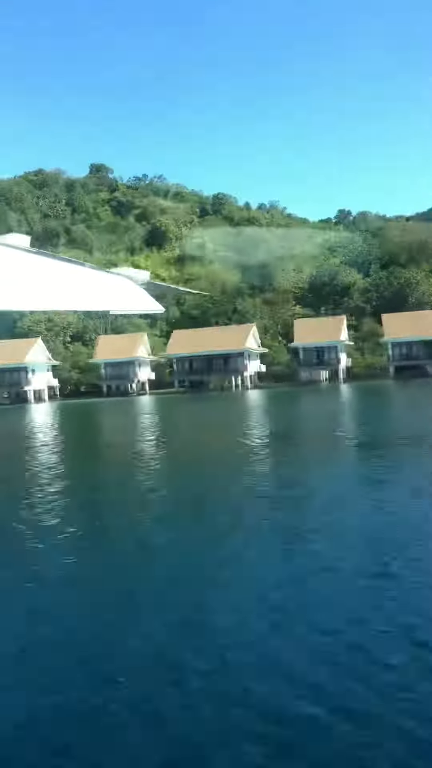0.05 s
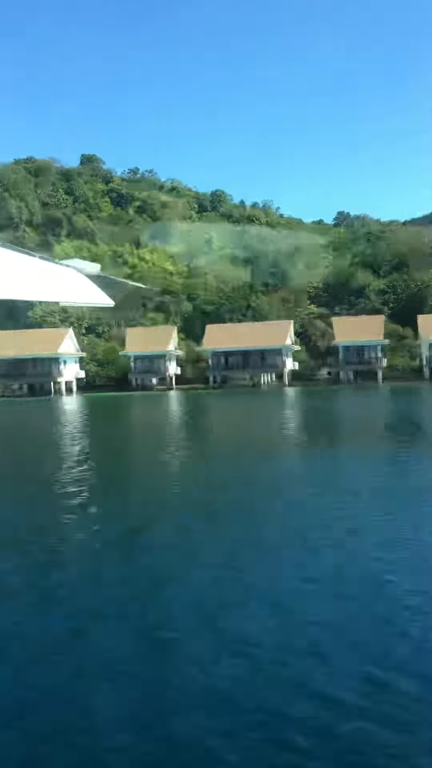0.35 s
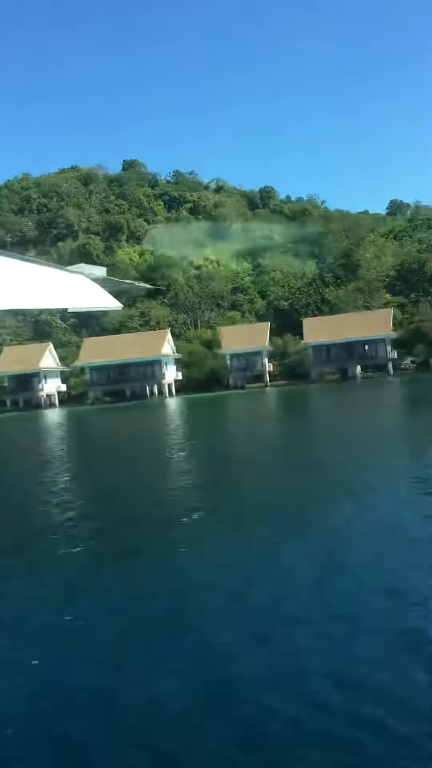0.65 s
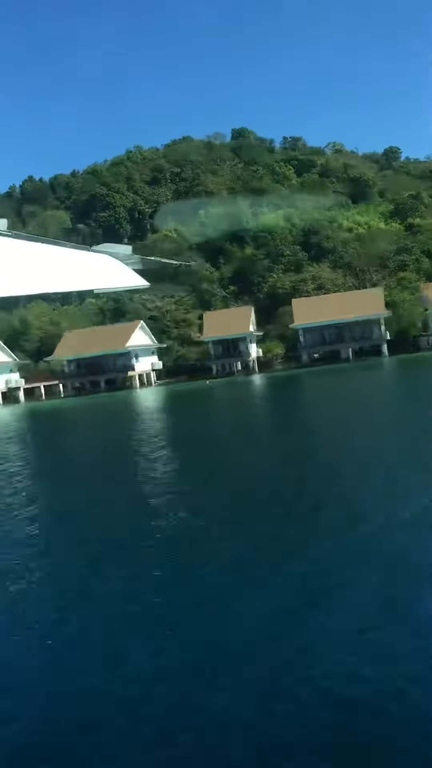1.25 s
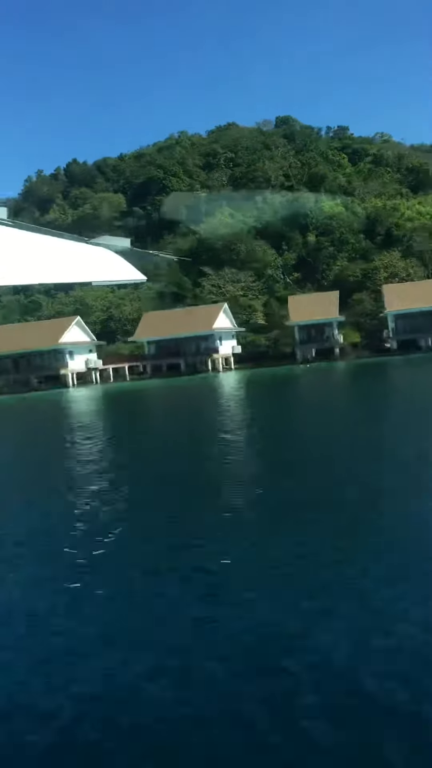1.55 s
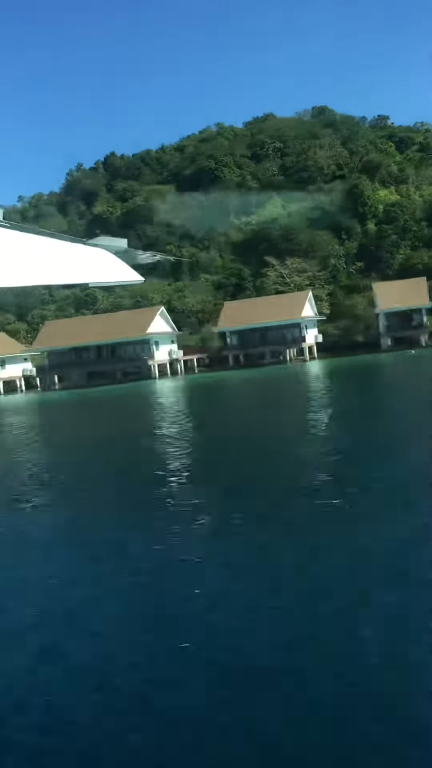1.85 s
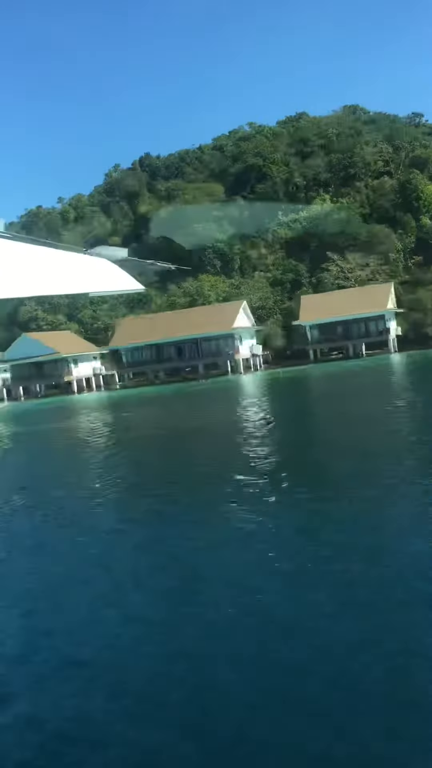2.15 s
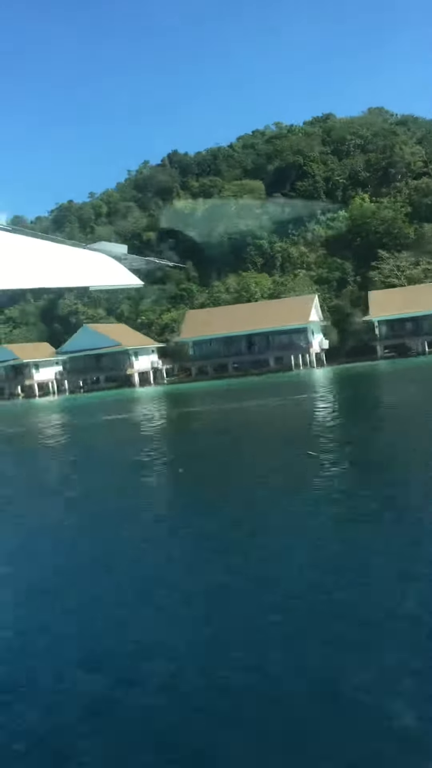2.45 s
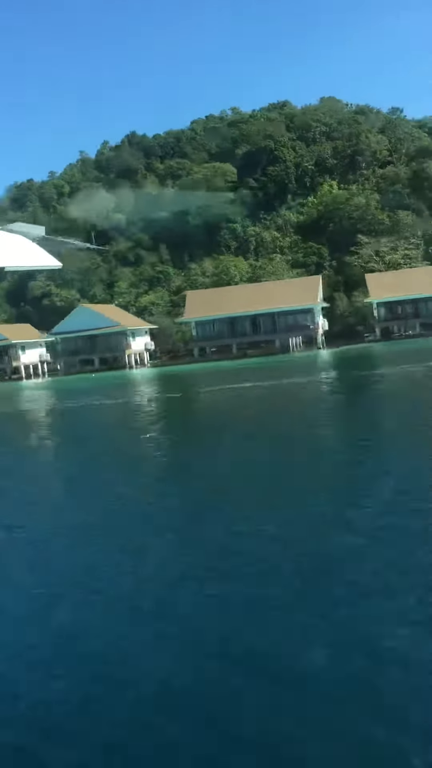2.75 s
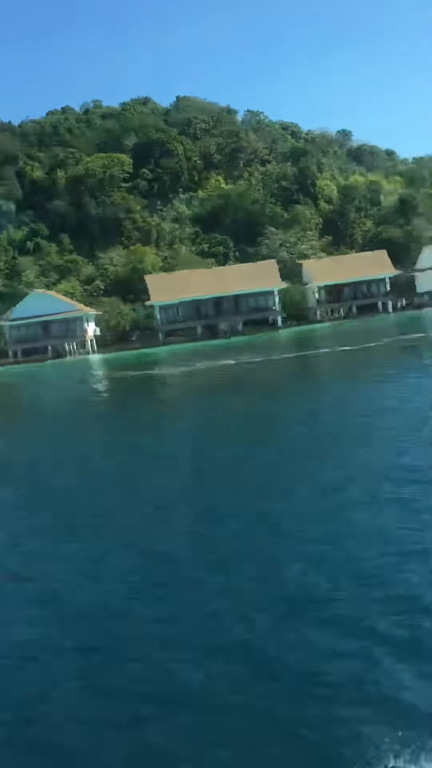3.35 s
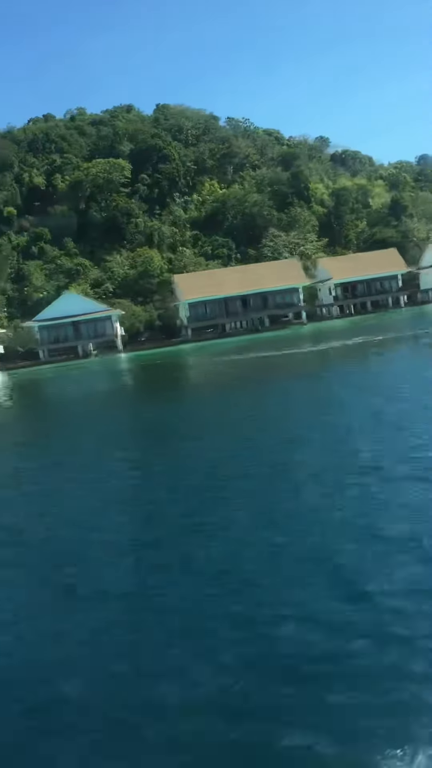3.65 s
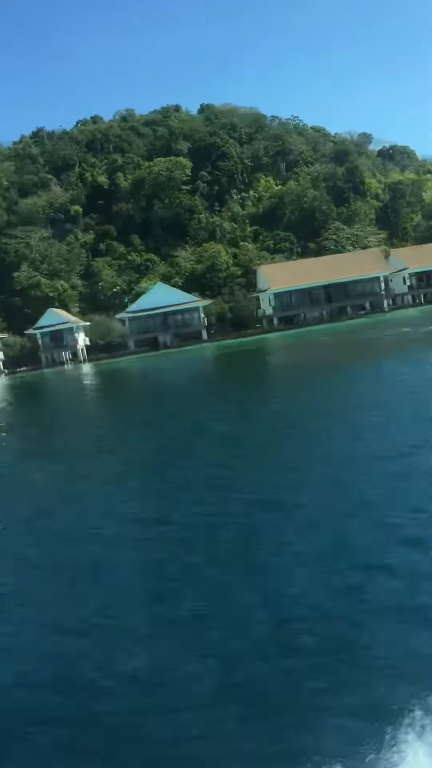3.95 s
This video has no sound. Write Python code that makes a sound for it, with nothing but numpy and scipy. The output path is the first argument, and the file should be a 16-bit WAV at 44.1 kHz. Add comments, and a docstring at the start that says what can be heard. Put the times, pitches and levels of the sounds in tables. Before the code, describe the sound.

Dull seaplane engine rumble inside the cabin, with howling air and short thumps.

```python
"""Engine and airframe rumble dully inside a seaplane skimming low over the water.
Their vibration makes the cabin boom, swelling in low buffets and short thumps as the airframe jolts.
Turbulent air howls in the cabin, sounds two resonances and hisses along the window.
Near the end, spray adds a brighter roar. A propeller drone and thin engine whines are faintly heard."""
import sys
import numpy as np
from scipy import signal
from scipy.fft import rfft, irfft
from scipy.io import wavfile
from scipy.ndimage import uniform_filter1d

SR = 44100
rng = np.random.default_rng(int(sys.argv[2]) if len(sys.argv) > 2 else 0)


def to_wav(sig):
    """Store sig (one row per channel, or 1-D mono) as 16-bit WAV at the path in sys.argv[1].

    Samples outside -1..1 are clipped; the rate is SR.
    """
    pcm = np.clip(np.atleast_2d(sig), -1, 1) * 32767
    pcm = np.round(pcm).astype(np.int16)
    wavfile.write(sys.argv[1], SR, pcm.T)  # frames by channels


N = 176400

# Propeller drone and engine whines. Each row: frequency in Hz, first level in dB, last level in dB,
# pitch waver as a fraction.
ENGINE_TONES = [(117.5, -27, -29, 0.044), (1449, -58, -51, 0.00073), (13303, -67, -67, 0.001033)]

# Roar of the spray. Each row: time in seconds, level in dB.
SPRAY_ENVELOPE = [(0, -74), (3.05, -55), (3.35, -33), (3.65, -30), (4, -30)]
# Spectrum of the spray. Each row: frequency in Hz, relative density in dB.
SPRAY_SPECTRUM = [(250, -24), (400, 5), (500, -21.5), (700, -5.5), (850, 4), (1000, 1.5), (1200, -10),
                  (1600, -12.5), (4000, -33)]

# Hollow ring within the howl. Each row: time in seconds, frequency in Hz, level in dB.
RING_PATH = [(0.4, 710, -45), (.85, 742, -34.5), (1.5, 742, -37.5), (1.72, 735, -42), (1.92, 729, -34),
             (2.2, 730, -33.5), (2.4, 660, -36.5), (3.2, 650, -36), (3.65, 702, -28)]
# Strength of the airflow. Each row: time in seconds, relative levels of howl, rush and hiss in dB.
AIRFLOW_ENVELOPES = [(0.0, -31.5, -36, -39), (0.45, -30.5, -35, -37), (0.75, -30, -33.5, -35.5),
                     (1.1, -28, -32, -35), (1.55, -29, -33, -35.5), (1.68, -31, -33.5, -37.5),
                     (1.82, -30.5, -34, -37.5), (1.95, -29, -34, -35.5), (2.5, -29.5, -33.5, -37),
                     (2.85, -28.5, -32.8, -34), (3.2, -29, -33.5, -35), (3.38, -28, -32, -34),
                     (3.7, -27, -34.5, -34), (4.0, -29.5, -34, -35.5)]
# Spectra of the airflow, from low to high. Each row: frequency in Hz, relative density in dB.
HOWL_SPECTRUM = [(200, -33), (450, -11), (540, -5), (620, 0.5), (765, 0), (815, -6), (960, -7),
                 (1100, -13.5), (1500, -20.5), (3000, -50)]
RUSH_SPECTRUM = [(400, -11.5), (1000, -4), (1600, -6), (1850, -1), (2350, -1.5), (2740, -3.5), (3150, -3),
                 (3900, -6.5), (4900, -10), (7000, -18.5), (10400, -29), (11000, -18), (16000, -20.5)]
HISS_SPECTRUM = [(3000, -19), (4950, -8.5), (5300, 0), (7100, 1), (9000, -4.5), (9800, -6), (10400, -12.5),
                 (11200, -19.5), (16000, -15)]
SIZZLE_SPECTRUM = [(5000, -23), (7000, -1), (7600, -1), (8100, 3), (8700, 3), (9500, -6), (10400, -27),
                   (16000, -40)]

# Jolts of the airframe, and a brief hum swelling at the very start (first row). Each row: peak time in seconds,
# half-width in seconds, pitch in Hz, level in dB.
BURSTS = [(0.035, 0.061, 125, -14.5), (0.53, .06, 102, -13), (0.72, 0.018, 108, -9),
          (1.59, 0.033, 130.5, -9.5), (2.39, 0.013, 190.9, -12.5), (2.809, 0.021, 137, -11),
          (2.998, 0.04, 112, -8), (3.261, 0.037, 154.2, -12.5), (3.539, 0.022, 155, -11),
          (3.782, 0.059, 120, -11.5)]
# Buffets on the airframe. Each row: start in seconds, length in seconds, relative level in dB.
BUFFET_EVENTS = [(0.415, 0.24, -19), (1.1, 0.12, -14), (1.53, 0.27, -12.5), (2.266, 0.51, -14),
                 (2.853, 0.2, -11.5), (3.095, 0.45, -14.5), (3.654, 0.39, -13)]
# Spectra of the buffets, rumble and cabin boom. Each row: frequency in Hz, relative density in dB.
BUFFET_SPECTRUM = [(20, -48), (30, -23), (40, -2), (65, -2.5), (120, -11.5), (180, -18), (400, -60),
                   (1000, -84)]
RUMBLE_SPECTRUM = [(20, -52), (30, -29), (46, -2), (65, -4), (88, -4.5), (112, 2), (145, -2.5), (180, -8),
                   (260, -20.5), (500, -37), (1500, -77)]
BOOM_SPECTRUM = [(60, -54), (130, -2.5), (175, 2), (210, .5), (245, -3.5), (290, -5), (335, -9.5),
                 (385, -14), (450, -20.5), (700, -26), (2000, -73)]
# Strength of the rumble and of the boom above it. Each row: time in seconds, relative level in dB.
RUMBLE_ENVELOPE = [(0.0, -18.5), (0.55, -16), (0.9, -18), (1.5, -18.5), (1.6, -18), (1.8, -17),
                   (2.22, -18.5), (2.6, -17), (3.0, -16.5), (3.1, -18), (3.4, -15), (4.0, -17)]
BOOM_ENVELOPE = [(0.0, -23.5), (0.45, -21), (1.65, -21.5), (1.82, -25), (2.2, -22), (2.35, -16.5),
                 (2.95, -16.5), (3.15, -21.5), (3.6, -20.5), (4.0, -24.5)]
# Sinking throb in the first second. Each row: time in seconds, frequency in Hz, level in dB.
THROB_PATH = [(0, 84, -30), (.15, 82.2, -23.5), (.33, 75.9, -19.5), (.45, 67, -19.5), (.63, 59.6, -21),
              (.9, 59.3, -62)]


def amp(db):
    """Amplitude grows tenfold for every 20 dB."""
    return 10 ** (np.asarray(db) / 20)


def unit(x):
    """Normalisation to an rms of one."""
    return x / np.sqrt(np.mean(x ** 2) + 1e-20)


def curve(table, column=1):
    """Linear interpolation gives one column of a time table at every sample."""
    rows = np.array(table)
    return np.interp(np.arange(N) / SR, rows[:, 0], rows[:, column])


def level(table, column=1):
    """An amplitude envelope follows one dB column of a time table."""
    return amp(curve(table, column))


def drift(rate_hz):
    """Low-pass filtered noise gives a slow random fluctuation of rms one."""
    hz = np.fft.rfftfreq(N, 1 / SR)
    white = rfft(rng.standard_normal(N))
    return unit(irfft(white * (hz > 0) / (1 + (hz / rate_hz) ** 4), N))


def noise(spectrum):
    """Spectral shaping turns white noise into turbulence of rms one."""
    knots_hz, db = np.transpose(spectrum)
    hz = np.fft.rfftfreq(N, 1 / SR)
    gain = amp(np.interp(np.log(hz + 1), np.log(knots_hz), db))
    return unit(irfft(rfft(rng.standard_normal(N)) * gain, N))


def steady(x, samples=6000):
    """Division by the running rms evens out slow swells and keeps fast flutter."""
    power = uniform_filter1d(uniform_filter1d(x ** 2, samples), samples)
    return x / np.sqrt(abs(power) + 1e-12)


def patchy(x, depth_db, patch_hz=170, patch_s=0.16):
    """Eddies modulate the spectrum, briefly raising and lowering narrow bands."""
    frame, hop = 512, 128
    spectra = signal.stft(x, nperseg=frame, noverlap=frame - hop)[2]
    eddies = rng.standard_normal(spectra.shape)
    eddies = uniform_filter1d(eddies, round(patch_hz * frame / SR), axis=0)
    eddies = uniform_filter1d(eddies, round(patch_s * SR / hop), axis=1)
    spectra *= amp(depth_db * unit(eddies))
    return unit(signal.istft(spectra, nperseg=frame, noverlap=frame - hop)[1][:N])


def tone(hz, waver, waver_hz):
    """Random frequency modulation moves a sine's pitch by the rms fraction `waver`."""
    cycles = np.cumsum(hz * (1 + waver * drift(waver_hz))) / SR
    return unit(np.sin(2 * np.pi * (cycles + rng.random())))


def resonance(hz, width_hz):
    """A resonance driven by turbulence gives narrow-band noise about its centre frequency."""
    phase = 2 * np.pi * np.cumsum(hz * np.ones(N)) / SR
    return steady(drift(width_hz / 2) * np.cos(phase) + drift(width_hz / 2) * np.sin(phase))


def engine_tones(flicker_db=4.5):
    """Periodic motion of propeller and engine radiates faint tones, wavering in pitch and level."""
    tones = np.zeros(N)
    for hz, first_db, last_db, waver in ENGINE_TONES:
        partial = tone(hz, waver, waver_hz=9)
        flicker = amp(flicker_db * drift(rate_hz=4.6))
        tones += amp(np.linspace(first_db, last_db, N)) * unit(partial * flicker)
    return tones


def spray():
    """Water thrown up beside the floats sums to a roar of random noise."""
    return level(SPRAY_ENVELOPE) * noise(SPRAY_SPECTRUM)


def air_resonances(whistle_hz=2041, whistle_db=-12):
    """Airflow excites two resonances: a wandering hollow ring and a whistle that follows the rush."""
    ring = level(RING_PATH, column=2) * resonance(curve(RING_PATH), width_hz=95)
    rush_level = level(AIRFLOW_ENVELOPES, column=2)
    whistle = amp(whistle_db) * rush_level * resonance(whistle_hz, width_hz=230)
    return ring + whistle


def cabin_howl(trim_db=-0.5, flutter_db=1.45):
    """Turbulence in the slipstream sounds in the cabin as a hollow, fluttering band of noise."""
    flutter = amp(trim_db + flutter_db * drift(rate_hz=20))
    return level(AIRFLOW_ENVELOPES, column=1) * flutter * steady(noise(HOWL_SPECTRUM))


def air_rush(trim_db=1, flutter_db=0.5):
    """Turbulent pressure fluctuations in the slipstream give a broadband rush."""
    flutter = amp(trim_db + flutter_db * drift(rate_hz=37))
    return level(AIRFLOW_ENVELOPES, column=2) * flutter * patchy(noise(RUSH_SPECTRUM), depth_db=1.5)


def window_hiss(trim_db=-0.9, flutter_db=0.84, sizzle_db=-32.5, reference_db=-32, growth=3.2):
    """Air hisses along the window; its top grows by a power law, so it brightens as it swells."""
    flow = level(AIRFLOW_ENVELOPES, column=3)
    sizzle = amp(sizzle_db) * (flow / amp(reference_db)) ** growth * noise(SIZZLE_SPECTRUM)
    hiss = amp(trim_db) * flow * patchy(noise(HISS_SPECTRUM), depth_db=1.0)
    return (hiss + sizzle) * amp(flutter_db * drift(rate_hz=23))


def thumps():
    """Transient excitation: each jolt booms in the cabin for a few uneven cycles; the first row gives a brief
    hum at the start."""
    t = np.arange(N) / SR
    booms = np.zeros(N)
    for peak_s, half_width_s, hz, db in BURSTS:
        envelope = amp(db) * np.exp(-2 * ((t - peak_s) / half_width_s) ** 2)
        booms += envelope * tone(hz, waver=0.1183, waver_hz=50)
    return booms


def buffets(trim_db=-2, rise_s=0.038, fall_s=0.068):
    """Unsteady loading shakes the airframe: each buffet swells, holds and dies as a deep shudder."""
    t = np.arange(N) / SR
    envelope = np.zeros(N)
    for start_s, length_s, db in BUFFET_EVENTS:
        ramps = np.minimum((t - start_s) / rise_s, (start_s + length_s - t) / fall_s)
        envelope += amp(db) * np.clip(ramps, 0, 1)
    return amp(trim_db) * envelope * steady(noise(BUFFET_SPECTRUM), samples=2200)


def rumble(boom_db=-1):
    """Forced vibration: engine and airframe shake the cabin into a rumble, a boom and a sinking throb."""
    low = level(RUMBLE_ENVELOPE) * steady(noise(RUMBLE_SPECTRUM), samples=3000)
    boom = amp(boom_db) * level(BOOM_ENVELOPE) * steady(noise(BOOM_SPECTRUM), samples=3000)
    throb = level(THROB_PATH, column=2) * tone(curve(THROB_PATH), waver=0.052, waver_hz=17)
    return low + boom + throb


def scene():
    """Superposition: the pressures of all sources add at one point in the cabin."""
    airframe = rumble() + buffets() + thumps()
    air = cabin_howl() + air_rush() + window_hiss() + air_resonances()
    return (airframe + air + spray() + engine_tones())[None]


def record(dry):
    """Soft saturation rounds off the tallest peaks, and a low-pass filter limits the band."""
    ceiling, cutoff_hz = 0.95, 15780
    rounded = dry / (1 + (dry / ceiling) ** 8) ** (1 / 8)
    lowpass = signal.firwin(1023, cutoff_hz, window=("kaiser", 9), fs=SR)
    return signal.oaconvolve(rounded, lowpass[None], "same")


dry = scene()
out = record(dry)
to_wav(out)
```